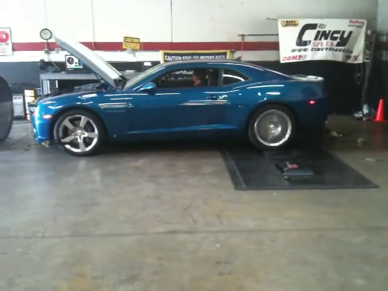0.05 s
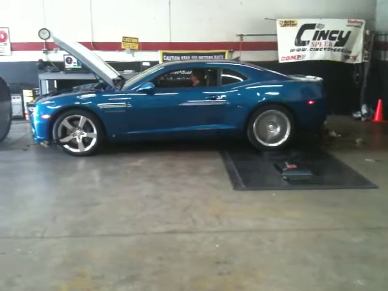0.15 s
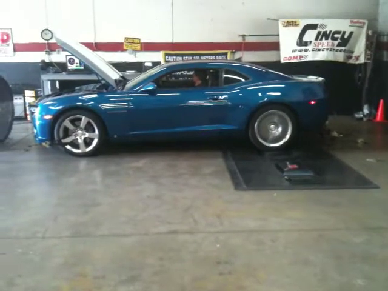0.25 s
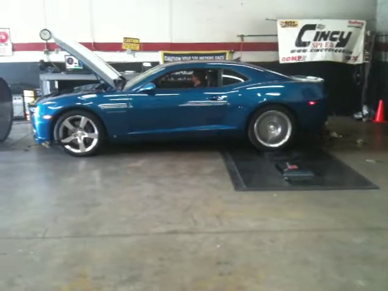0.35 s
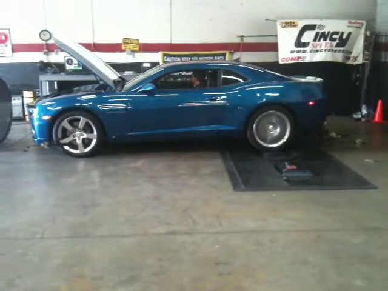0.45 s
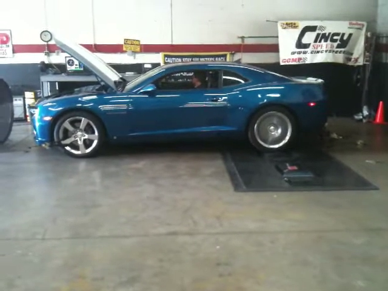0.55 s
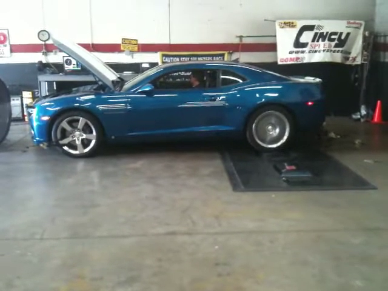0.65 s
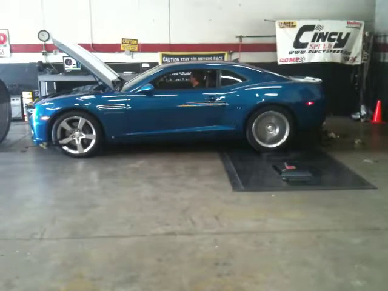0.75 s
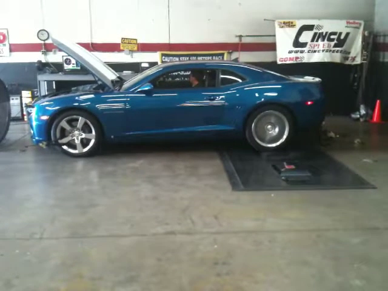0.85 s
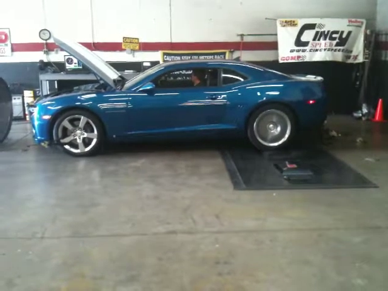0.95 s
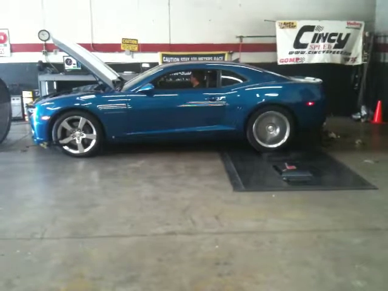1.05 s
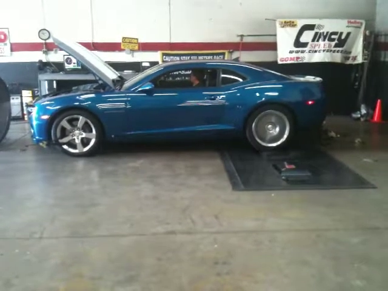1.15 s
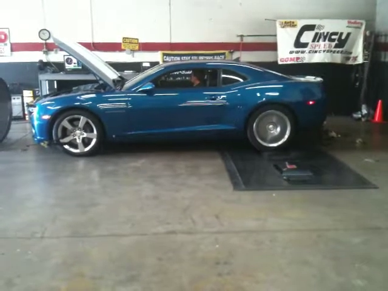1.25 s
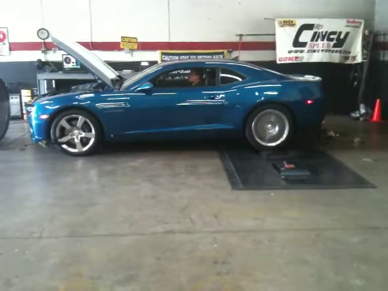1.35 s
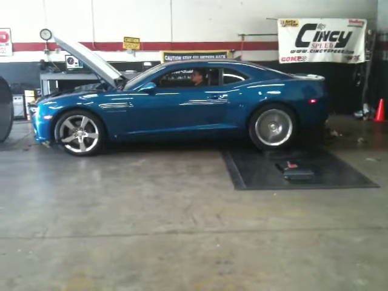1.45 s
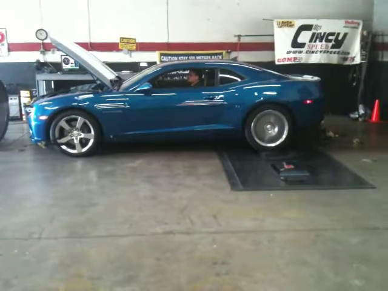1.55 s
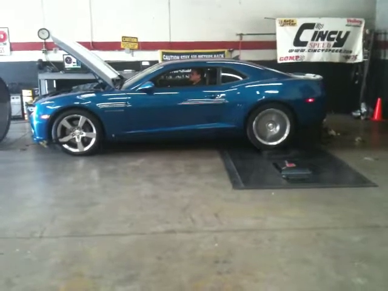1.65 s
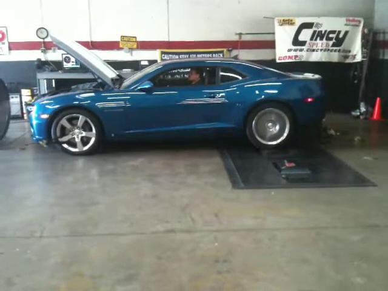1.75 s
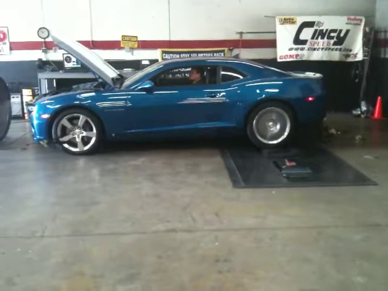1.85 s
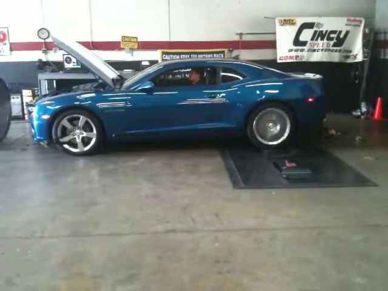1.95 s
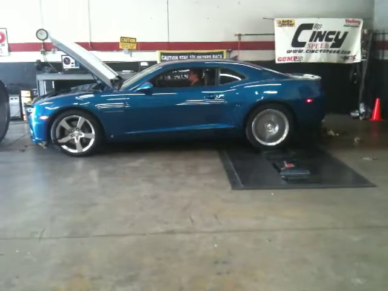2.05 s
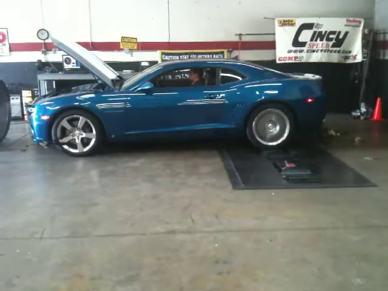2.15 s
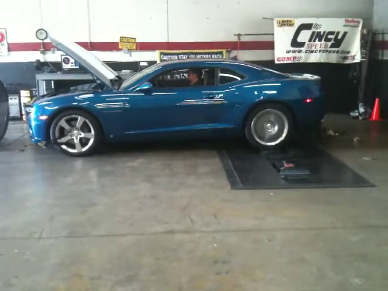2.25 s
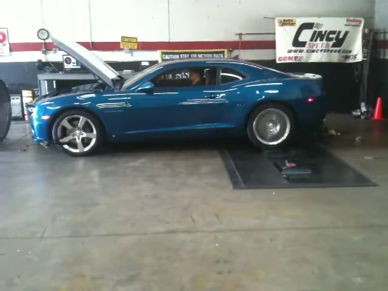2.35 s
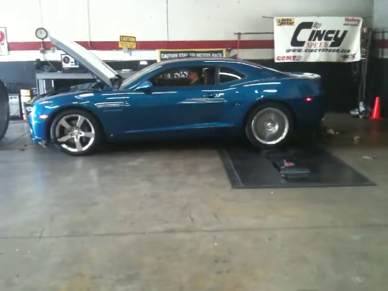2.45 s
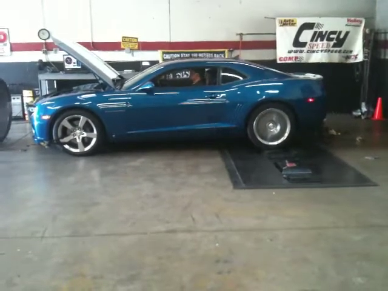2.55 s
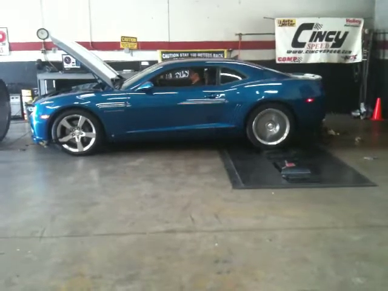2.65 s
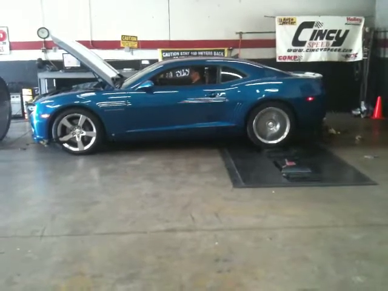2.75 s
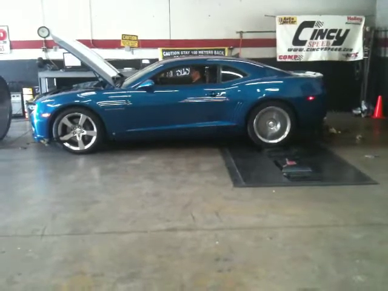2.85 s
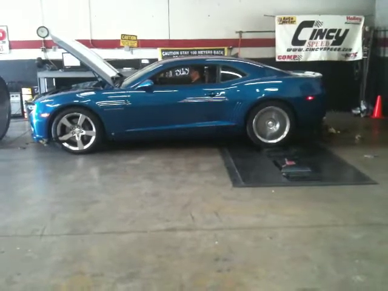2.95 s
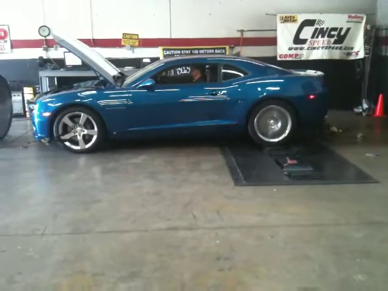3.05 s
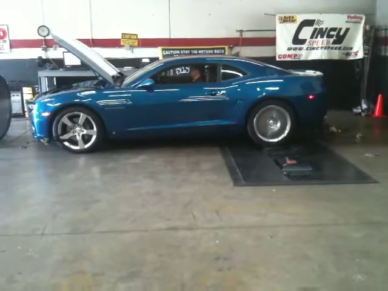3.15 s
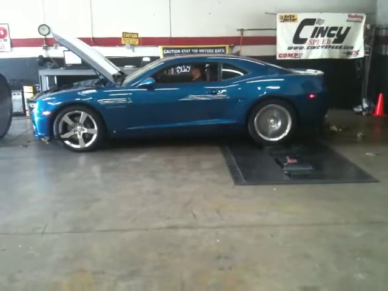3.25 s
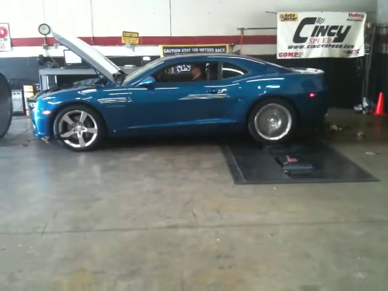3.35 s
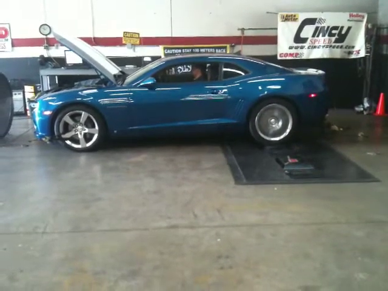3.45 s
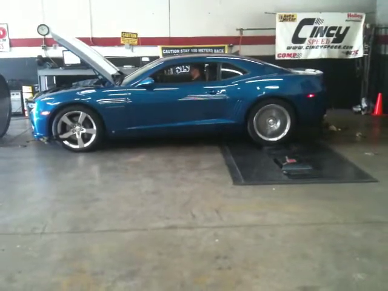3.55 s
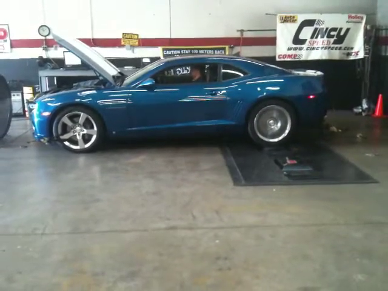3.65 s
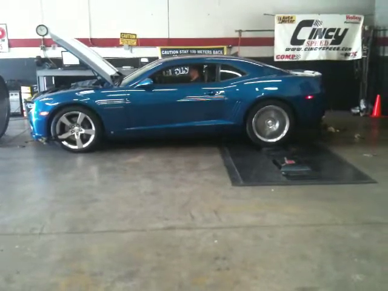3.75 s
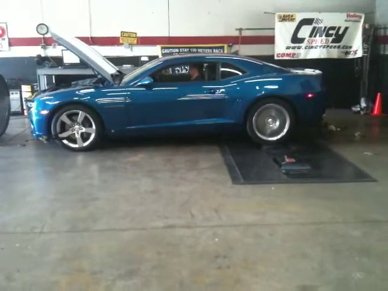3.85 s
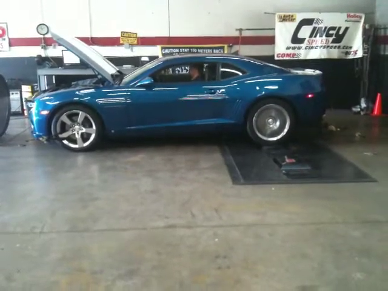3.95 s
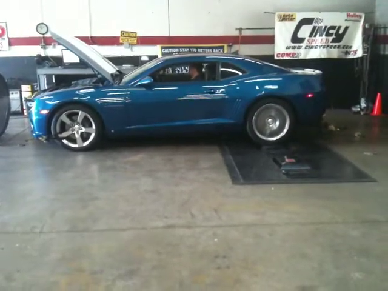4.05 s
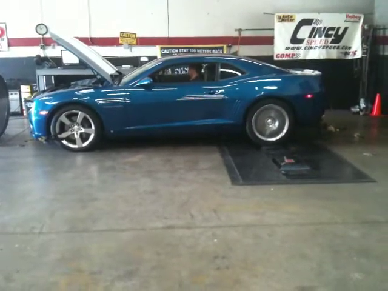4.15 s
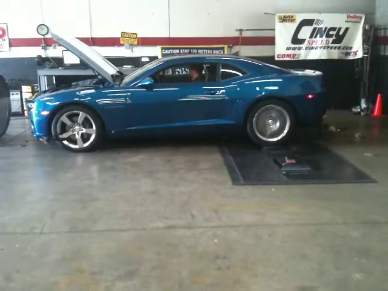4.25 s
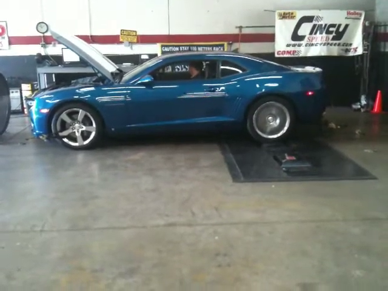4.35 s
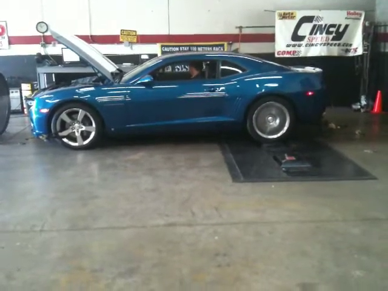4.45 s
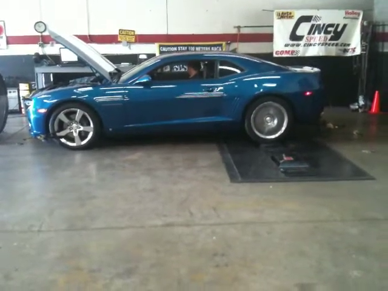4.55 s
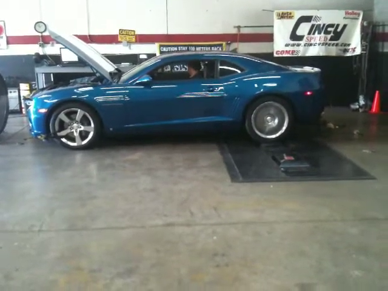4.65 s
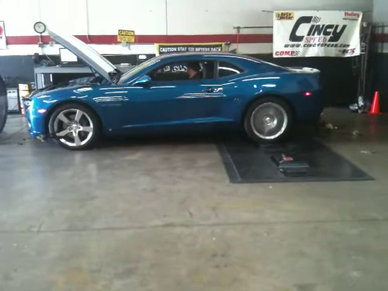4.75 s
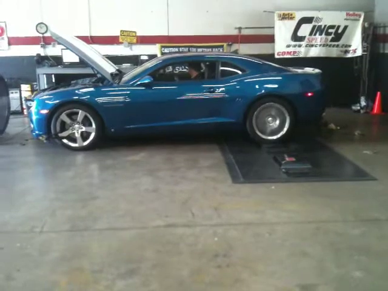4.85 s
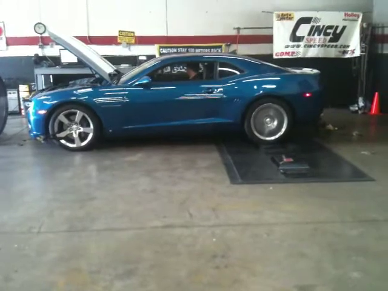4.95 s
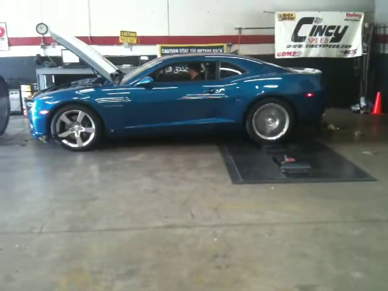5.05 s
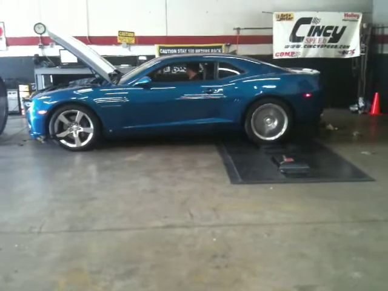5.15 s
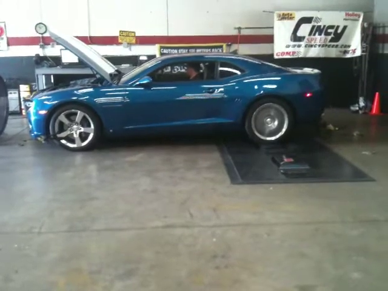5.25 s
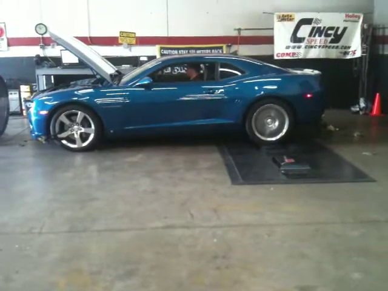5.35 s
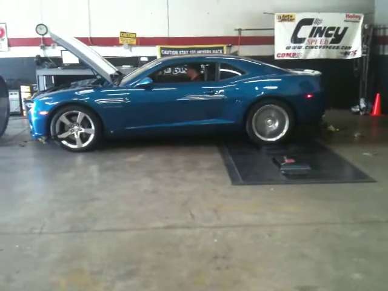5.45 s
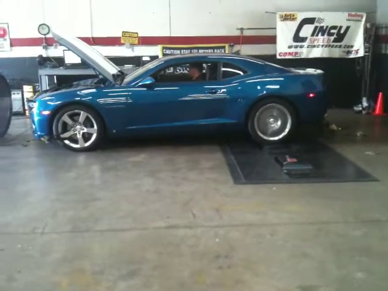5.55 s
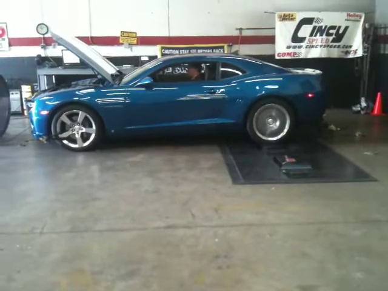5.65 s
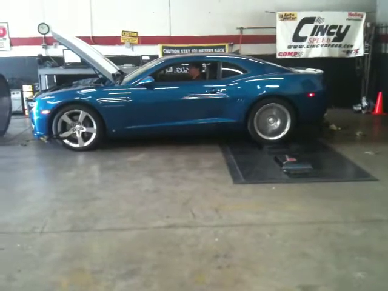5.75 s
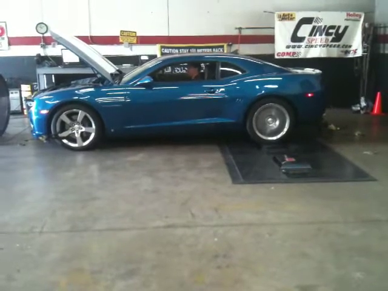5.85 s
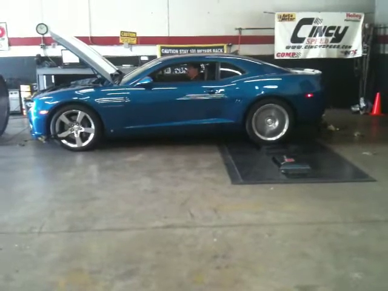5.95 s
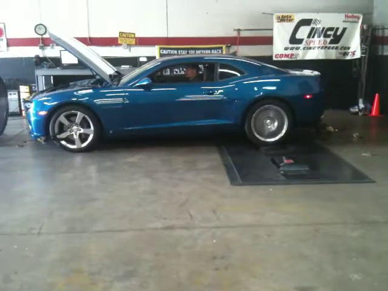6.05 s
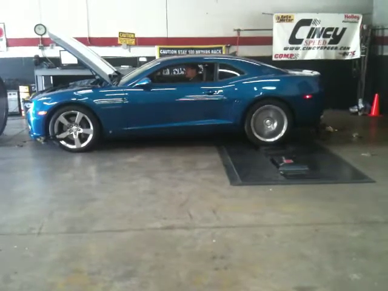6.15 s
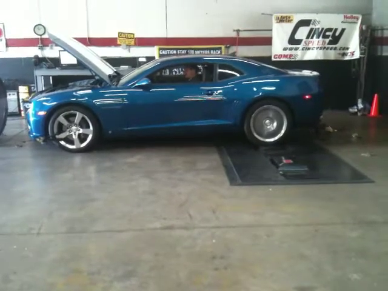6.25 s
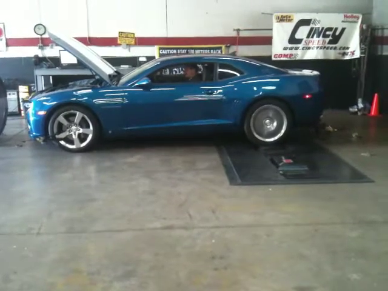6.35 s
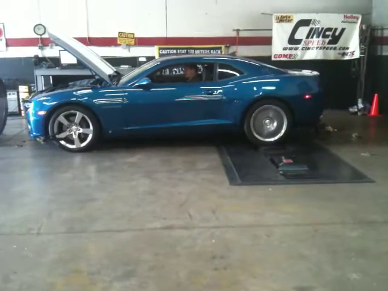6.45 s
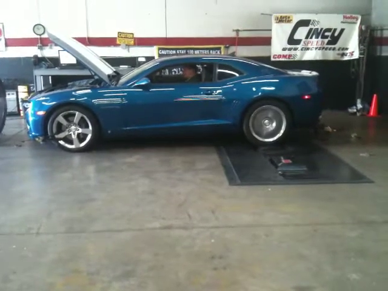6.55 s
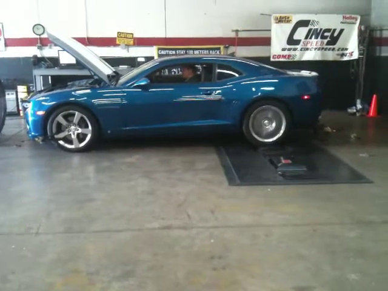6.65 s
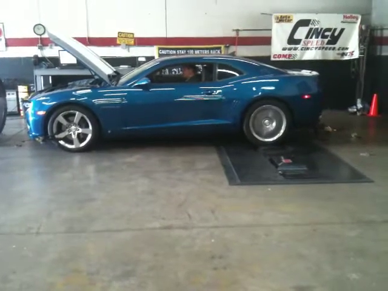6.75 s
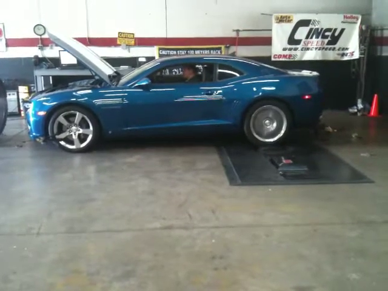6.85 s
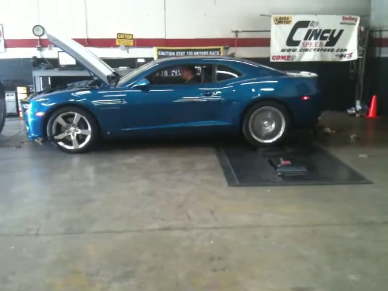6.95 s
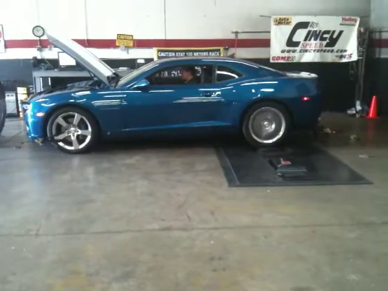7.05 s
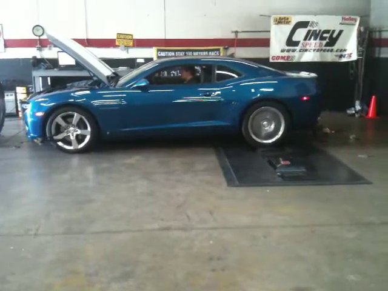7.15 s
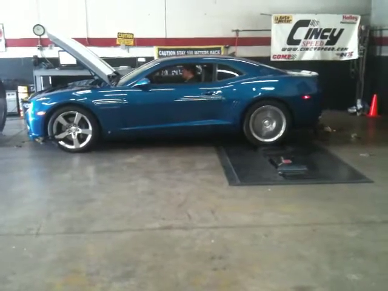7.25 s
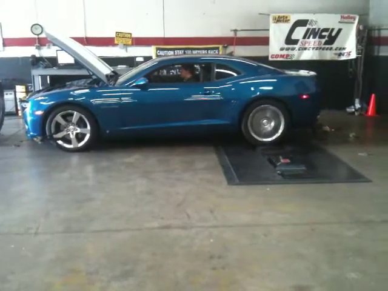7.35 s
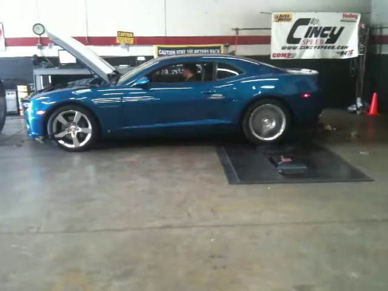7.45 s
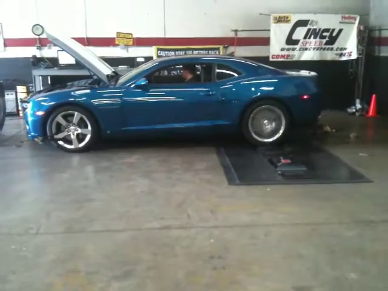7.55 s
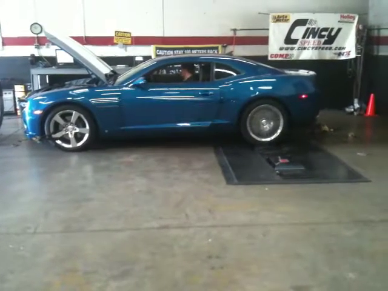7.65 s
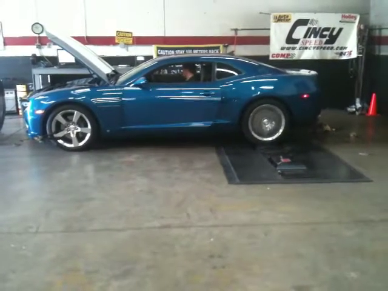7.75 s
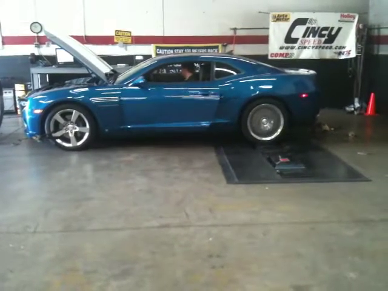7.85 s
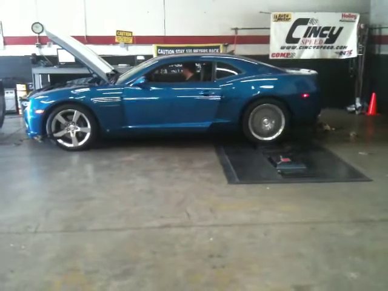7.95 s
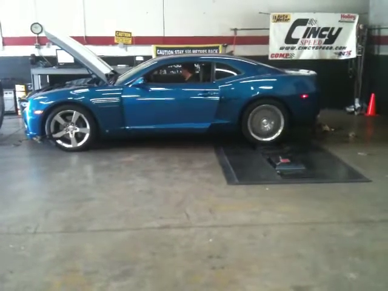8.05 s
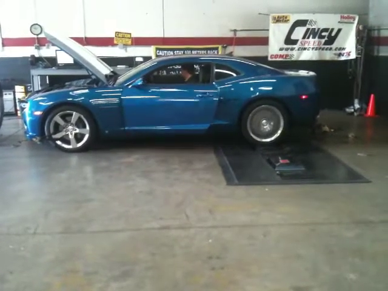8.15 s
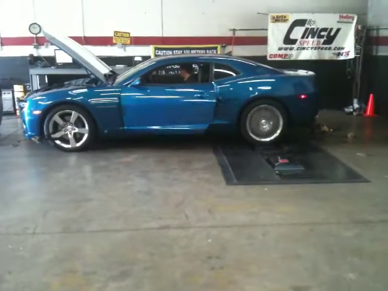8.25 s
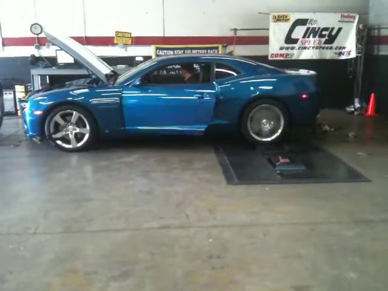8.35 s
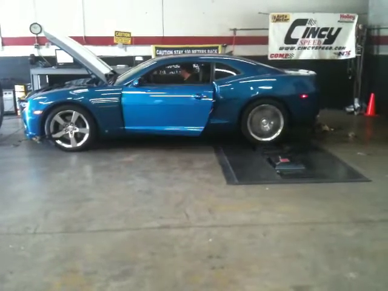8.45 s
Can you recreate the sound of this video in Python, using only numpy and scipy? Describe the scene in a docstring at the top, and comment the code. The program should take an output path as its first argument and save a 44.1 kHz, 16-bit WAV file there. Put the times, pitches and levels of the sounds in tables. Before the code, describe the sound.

A car engine at full throttle on a dynamometer lifts off, and roaring tyres and a whining roller slowly wind down.

```python
"""A V6 coupe ends a full-throttle pull on a chassis dynamometer, a few metres off in a hard-walled workshop.
The throttle closes: the exhaust's firing drone gives way to a burble and a hum that sinks to idle.
The tyres roar on the slowing roller, its knurled face whines down, the driveline howls, a fan blows.
The small mono microphone takes one thump of air just before the lift. It rides its gain control
and overloads until the roller has lost much of its speed."""
import sys
import numpy as np
from scipy import signal
from scipy.fft import rfft, irfft
from scipy.io import wavfile
from scipy.ndimage import uniform_filter1d

SR = 44100
rng = np.random.default_rng(int(sys.argv[2]) if len(sys.argv) > 2 else 0)


def dump(signal):
    """Clip the signal to [-1, 1] and save it as 16-bit WAV at the path in sys.argv[1]."""
    limited = np.clip(np.atleast_2d(signal).T, -1, 1)
    pcm = np.round(limited * 32767).astype(np.int16)
    wavfile.write(sys.argv[1], SR, pcm)


N = 374850
TIME = np.arange(N) / SR
LIFT_S = 1.52  # the throttle closes
COAST_S = np.maximum(TIME - LIFT_S, 0)  # time since the lift
OVERRUN_ONSET = 1 - np.exp(-COAST_S / 0.18)  # fade-in of the off-throttle hum and burble
BANK = 3  # cylinders on each exhaust pipe


def undb(db):
    """Decibels to gain."""
    return 10 ** (np.asarray(db) / 20)


def unit(x):
    """Scale to rms 1."""
    return x / np.sqrt(np.mean(x ** 2))


def spectrum_at(hz, points):
    """Level in dB of a (frequency [Hz], level [dB]) curve on a log-frequency axis."""
    f, db = np.transpose(points)
    return np.interp(np.log(np.maximum(hz, 1)), np.log(f), db)


def peaks_at(hz, peaks):
    """Rise in dB from bell-shaped (centre [Hz], width [Hz], rise [dB]) peaks."""
    return sum(rise * np.exp(-2 * ((hz - centre) / width) ** 2) for centre, width, rise in peaks)


def noise(points):
    """Noise of rms 1 with the given spectrum."""
    gain = undb(spectrum_at(np.fft.rfftfreq(N, 1 / SR), points))
    return unit(irfft(rfft(rng.standard_normal(N)) * gain, N))


def walk(rate):
    """Smooth random motion of spread 1, up to about rate changes a second."""
    t = TIME[::50]
    low_pass = np.exp(-(np.fft.rfftfreq(len(t), t[1]) / rate) ** 2)
    slow = irfft(rfft(rng.standard_normal(len(t))) * low_pass, len(t))
    return np.interp(TIME, t, unit(slow))


def angle(hz):
    """Phase in radians of something turning at hz."""
    return 2 * np.pi * np.cumsum(hz) / SR


def halvings(speed):
    """How many times a speed has halved from its top."""
    return np.log2(speed.max() / speed)


def workshop(x, t60, wet_db):
    """Direct sound plus the diffuse tail off the hard walls, at equal total power."""
    t = TIME[:SR]
    tail = rng.standard_normal(SR) * np.exp(-np.log(1000) * t / t60) * (t > .005)
    wet = signal.fftconvolve(x, tail / np.linalg.norm(tail))[:N]
    return (x + undb(wet_db) * wet) / np.hypot(1, undb(wet_db))


# the fan as heard at the microphone: (frequency [Hz], level [dB])
FAN_SPECTRUM = [(25, -45), (60, -58), (125, 6), (190, 3.5), (280, 6), (420, -4.5), (800, -2), (1600, 0.5),
                (2500, -3), (5500, -4), (10000, -3.5), (15500, -38)]
def cooling_fan(level_db=-32.5, flutter_db=.6):
    """A faint, slightly fluttering rush of air behind the car."""
    return undb(level_db + flutter_db * walk(21)) * noise(FAN_SPECTRUM)


def air_thump(at_s=1.423, width_s=0.0022, peak_db=9):
    """One short, dull push of air right on the microphone."""
    return undb(peak_db) * np.exp(-((TIME - at_s) / width_s) ** 2)


def roller_speed(start_hz=8410, top_hz=9100, sag_hz=50, brake_s=2.19):
    """Rate at which the knurl passes under the tyre: it climbs, sags running free, then is braked."""
    brake_hz_per_s, tightening_hz_per_s2 = 1118, 29
    braked_s = np.maximum(TIME - brake_s, 0)
    free_hz = np.interp(TIME, [0, LIFT_S, brake_s], [start_hz, top_hz, top_hz - sag_hz])
    return free_hz - brake_hz_per_s * braked_s - tightening_hz_per_s2 * braked_s ** 2 / 2


# rough tones of the coasting gears and tread, the last a high companion of the knurl's whistle: # (pitch at top
# speed [Hz], blur [Hz], level [dB], loudest at knurl rate [Hz], width of that range [Hz])
HOWL_BANDS = [(2430, 40, -19, 9100, 600), (2770, 22, -19.5, 8900, 800), (2900, 35, -25, 5000, 1400),
              (4190, 40, -20.5, 9100, 450), (4330, 90, -23, 7800, 700), (4270, 50, -27.5, 5600, 900),
              (5740, 130, -19.5, 8200, 650), (20850, 110, -33, 3000, 1100)]
def driveline(knurl_hz, settle_s=.06):
    """With the drive off, gears and tread howl in narrow, wavering bands that fall with the roller; one high
    band sings along with the knurl's whistle."""
    onset = 1 - np.exp(-COAST_S / settle_s)
    howl = 0
    for top_hz, blur_hz, db, loudest_hz, width_hz in HOWL_BANDS:
        phase = angle(top_hz * knurl_hz / knurl_hz.max())
        band = walk(blur_hz) * np.sin(phase) + walk(blur_hz) * np.cos(phase)
        howl = howl + band * undb(db) * np.exp(-((knurl_hz - loudest_hz) / width_hz) ** 2)
    return howl * onset


# speeds at which the knurl's fundamental swells: (knurl rate [Hz], width [Hz], rise [dB])
FUNDAMENTAL_SWELLS = [(7300, 2800, 10.5), (5100, 570, 10)]
# speeds at which its whistles swell or fade together: (knurl rate [Hz], width [Hz], rise [dB])
WHISTLE_SWELLS = [(7000, 1200, 3), (4910, 290, 6), (3570, 3100, 16), (3450, 220, 1.5), (1450, 420, -7)]
# the whistles: (pitch [multiple of the knurl rate], relative level [dB])
WHISTLES = [(1.71, -13), (2, 0.5), (2.301, -11), (3, -12)]
def knurl(hz, slip=.005, flicker_db=2):
    """The roller's ridges sing against the rubber; slip blurs the pitch and the room smears the glide."""
    fundamental_db = -28.5 - 10.5 * halvings(hz) + peaks_at(hz, FUNDAMENTAL_SWELLS)
    whistle_db = -29.5 - 8.5 * halvings(hz) + peaks_at(hz, WHISTLE_SWELLS)
    phase = angle(hz * (1 + slip * walk(92.1)))
    tone = undb(fundamental_db) * walk(100) * np.sin(phase)
    for k, db in WHISTLES:
        level = undb(whistle_db + db + flicker_db * walk(25))
        tone = tone + level * np.sin(k * phase) * (k * hz < SR / 2)
    return workshop(np.sqrt(2) * tone, t60=0.61, wet_db=-2.5)


def tread_blocks(turns, size=512, lowest_order=45):
    """The uneven tread blocks strike the roller in the same pattern on every turn of the wheel."""
    orders = rfft(rng.standard_normal(size))
    pattern = irfft(orders * (np.arange(len(orders)) >= lowest_order), 20 * size)
    return unit(np.interp(turns, np.arange(len(pattern)) / len(pattern), pattern, period=1))


# broad tyre roar at top speed: (frequency [Hz], level [dB])
ROAR_SPECTRUM = [(200, -4.5), (600, -4), (900, -3), (1400, -1.5), (1750, -10), (2200, -1), (3300, 2),
                 (6000, 1), (8500, -2), (10500, -2), (14500, -4), (21000, -5.5), (30000, -8), (70000, -24)]
# humps of the tread pitches and the knurl at top speed: (centre [Hz], width [Hz], nominal rise [dB])
TREAD_HUMPS = [(1564, 84, 2.5), (1990, 39, 8.5), (2380, 480, 6.5), (2430, 35, 2.5), (2776, 61, 3),
               (2890, 280, 6), (4480, 370, 2.5), (5300, 290, 0.5), (5700, 530, 4), (8280, 1100, 3.5),
               (9100, 350, 4), (16740, 260, 4), (17900, 400, 5.5), (20850, 720, 3.5), (27390, 770, -13)]
# colour from car body and workshop on the way to the microphone: (frequency [Hz], level [dB])
BODY_COLOUR = [(25, -34), (60, -22), (90, -8), (130, 3), (200, 1), (280, 4), (420, -3), (800, -2),
               (1400, 0), (2200, -2), (3300, -1), (5200, 0), (9000, 0), (15000, -3)]
# resonances of roller drum, pit cover and wheel arch: (centre [Hz], width [Hz], rise [dB])
PANEL_RESONANCES = [(1320, 114, 1), (1666, 240, 3), (2710, 410, 0.5), (4060, 440, 1), (4990, 430, 1.5)]
def tyres(speed, top_wheel_hz=29.6, creep=.003, unload_s=0.98, flutter_db=0.54, throb=0.017):
    """Tread impacts and pumped air; the spectrum slides with speed (1 at the top), the body colours it."""
    slowed = halvings(speed)
    drive = np.exp(-COAST_S / unload_s)
    level_db = -4.5 - 12 * slowed
    tilt_db_per_octave = -2.5 + 3.5 * slowed + 2 * drive
    hump_depth = 1.04 - 0.16 * drive ** 2 - 0.22 * slowed  # slip under drive blurs the humps
    wheel = angle(top_wheel_hz * speed * (1 + creep * walk(5.99)))
    blocks = workshop(tread_blocks(wheel / (2 * np.pi)), t60=0.46, wet_db=1.0)
    contact = rng.standard_normal(N) + undb(-6) * np.sqrt(speed) * blocks
    f, t, frames = signal.stft(unit(contact), SR, nperseg=2048)
    f = f[:, None]
    at_top_hz = f / np.interp(t, TIME, speed)
    panel_db = peaks_at(f, PANEL_RESONANCES)
    humps = np.interp(t, TIME, hump_depth) + 0.13 * panel_db  # humps swell as they cross a resonance
    sliding_db = spectrum_at(at_top_hz, ROAR_SPECTRUM) + humps * peaks_at(at_top_hz, TREAD_HUMPS)
    tilt_db = np.interp(t, TIME, tilt_db_per_octave) * np.log2(1 + f / 1000)
    gain = undb(sliding_db + spectrum_at(f, BODY_COLOUR) + panel_db + tilt_db)
    roar = signal.istft(frames * gain / np.sqrt(np.mean(gain ** 2, axis=0)), SR)[1][:N]
    return roar * undb(level_db + flutter_db * walk(13.0)) * (1 + throb * np.sin(wheel))


def engine_speed(start_hz=50.5, climb_hz_per_s=2.63, friction_hz_per_s=7.6, idle_hz=6):
    """Four-stroke cycles a second: an even climb, a quick sag at the lift, then a run-down to idle."""
    pull_hz = start_hz + climb_hz_per_s * np.minimum(TIME, LIFT_S)
    pumping_loss_hz = 16.0 * (1 - np.exp(-COAST_S / .42))  # pumping against the closed throttle plate
    return np.maximum(pull_hz - pumping_loss_hz - friction_hz_per_s * COAST_S, idle_hz)


# standing waves between car, floor and walls: (centre [Hz], width [Hz], rise [dB])
ROOM_MODES = [(209, 3.9, 5.5), (254.7, 2.8, 7.5), (279.6, 8.6, 8), (364, 6.6, -2), (424, 6.2, 11),
              (536, 8.7, 3.5), (555, 10, 13.5), (623.4, 21, 9.5), (695, 19, 11.5), (771, 6.1, 12.5),
              (810, 10, 4.5)]
def standing_waves(hz):
    """Rise in dB at the microphone as a slowly gliding line passes the standing waves."""
    return np.interp(TIME, TIME[::100], peaks_at(hz[::100], ROOM_MODES))


# colour of the exhaust gas: (frequency [Hz], level [dB])
GAS_SPECTRUM = [(25, -31), (85, -67), (150, -2), (280, -4), (400, -11.5), (620, -0.5), (850, -6),
                (1300, -4), (3000, -10), (8000, -37)]
def gas_rush(cycle_hz, phase, puff=0.32):
    """Gas leaves the pipes with a puff at each firing, quieter as the engine slows."""
    level_db = -9.5 - 10.5 * halvings(cycle_hz)
    return noise(GAS_SPECTRUM) * (1 + puff * np.sin(BANK * phase)) * undb(level_db)


# colour of the burble: (frequency [Hz], level [dB])
BURBLE_SPECTRUM = [(70, -38), (130, -7), (200, -15), (300, -6), (420, -8), (560, -0.5), (680, -5),
                   (850, -16), (1500, -28)]
def burble(phase, decay_s=0.5, scatter_db=1.5):
    """Unburnt gas burbles in the pipes just after the lift, one uneven puff for each firing of the bank."""
    swell = undb(-6) * OVERRUN_ONSET * np.exp(-COAST_S / decay_s)
    puffs = (1 + .5 * np.sin(BANK * phase)) * undb(-scatter_db * walk(58))
    return noise(BURBLE_SPECTRUM) * puffs * swell


# exhaust lines off throttle: (pitch [multiple of the cycle rate], relative level [dB])
OVERRUN_LINES = [(3, -30), (6, 1), (9, 5), (12, -6.5), (15, -23), (18, -9.5)]
# pipe response off throttle: (frequency [Hz], level [dB])
PIPE_RESPONSE = [(40, -40), (62, -28), (85, -8), (120, 1.5), (170, 5), (220, 0), (280, 1), (370, 8.5),
                 (440, -15), (540, -17), (640, 16.5), (720, 8), (1000, -23)]
def overrun_hum(cycle_hz, phase, rough_db=2.5, stagger=0.105):
    """Off throttle all cylinders pump alike: bank-rate harmonics sweep unevenly through pipe resonances."""
    uneven_phase = phase + stagger * walk(22) / BANK
    hum = 0
    for k, db in OVERRUN_LINES:
        resonance_db = spectrum_at(k * cycle_hz, PIPE_RESPONSE) + standing_waves(k * cycle_hz)
        hum = hum + undb(db + resonance_db + rough_db * walk(15)) * np.sin(k * uneven_phase)
    level = undb(-16 - 7 * halvings(cycle_hz)) * OVERRUN_ONSET
    return workshop(unit(hum) * level, t60=0.94, wet_db=-3.0)


# exhaust lines under load, the third being each bank's firing rate:
# (pitch [multiple of the cycle rate], relative level [dB])
LOADED_LINES = [(1, -94), (2, -30), (3, -0.5), (4, -9.5), (5, -4.5), (6, -13.5), (7, -11.5), (8, -15.5),
                (9, -9.5), (10, -6), (11, -12.5), (12, -4), (13, -17), (14, -6), (15, -9), (16, -15),
                (17, -6), (18, -14), (19, -16), (20, -13), (21, -9.5)]
# narrow pipe resonances that the firing line climbs through: (centre [Hz], width [Hz], rise [dB])
PIPE_BOOMS = [(157.5, 2.8, 9.5), (162.6, 3.0, 8)]
def drone(cycle_hz, phase, bark=.38, scatter_rad=1.5, release_db_per_s=29):
    """Under load the firing line booms; the others throb once a cycle, as one cylinder barks loudest."""
    boom_db = peaks_at(BANK * cycle_hz, PIPE_BOOMS)
    throb = 1 + bark * np.cos(phase)
    lines = 0
    for k, db in LOADED_LINES:
        if k == BANK:
            line = undb(boom_db + 0.3 * walk(9)) * np.sin(k * phase)
        else:
            line = undb(1.5 * walk(4.1)) * np.sin(k * phase + scatter_rad * walk(1.04)) * throb
        lines = lines + undb(db + standing_waves(k * cycle_hz)) * line
    return unit(lines) * undb(-7 - release_db_per_s * COAST_S)


def exhaust(jitter=0.0031):
    """The tailpipes from a few metres: hum, gas, drone and burble follow one slightly unsteady engine."""
    cycle_hz = engine_speed()
    phase = angle(cycle_hz * (1 + jitter * walk(24)))
    return overrun_hum(cycle_hz, phase) + gas_rush(cycle_hz, phase) + drone(cycle_hz, phase) + burble(phase)


def scene():
    """Fan, car and roller reach one microphone a few metres away, the same in both channels."""
    knurl_hz = roller_speed()
    mono = cooling_fan() + air_thump() + exhaust()
    mono += tyres(knurl_hz / knurl_hz.max()) + knurl(knurl_hz) + driveline(knurl_hz)
    return np.array([mono, mono])


def gain_control(x, limit_db=-6.0):
    """The microphone turns its gain down as the running power nears the limit."""
    power = uniform_filter1d(x ** 2, size=SR // 4, axis=1)
    return x / np.sqrt(np.hypot(1, power / undb(limit_db) ** 2))


def record(dry, ceiling=0.73, knee=5, top_hz=15790):
    """The small microphone: gain control holds the level, overload flattens peaks, the top is cut."""
    oversampled = signal.resample_poly(gain_control(dry), 2, 1, axis=1)
    flattened = oversampled / (1 + np.abs(oversampled / ceiling) ** knee) ** (1 / knee)
    overloaded = signal.resample_poly(flattened, 1, 2, axis=1)
    low_pass = signal.firwin(1201, top_hz, fs=SR, window="blackman")
    return signal.fftconvolve(overloaded, low_pass[None], mode="same", axes=1)


dry = scene()
out = record(dry)
dump(out)
```